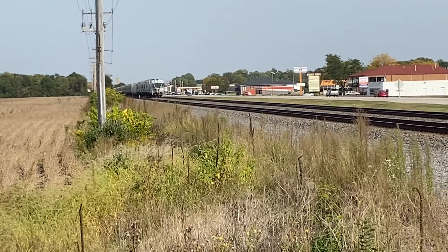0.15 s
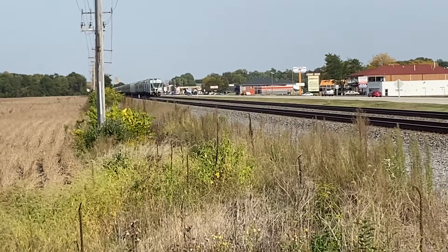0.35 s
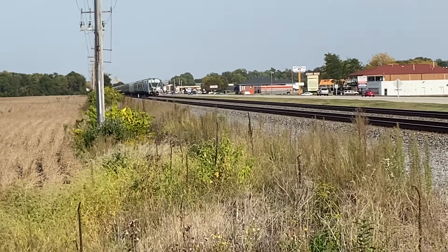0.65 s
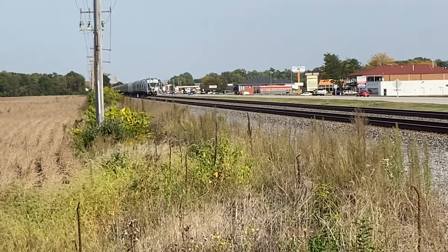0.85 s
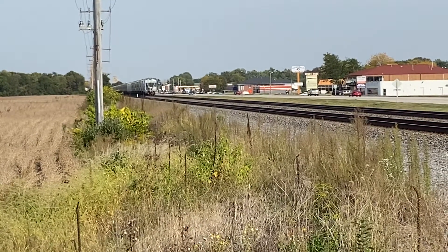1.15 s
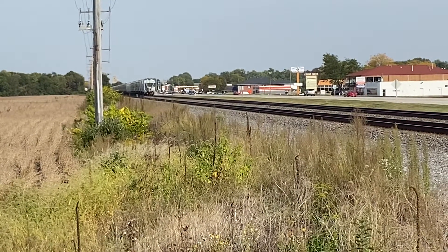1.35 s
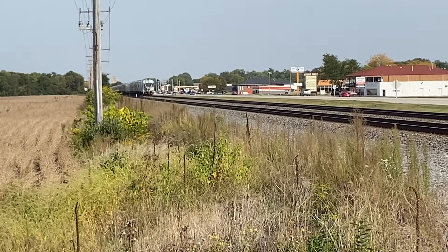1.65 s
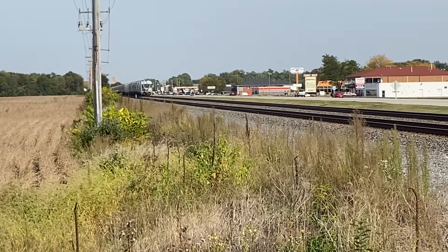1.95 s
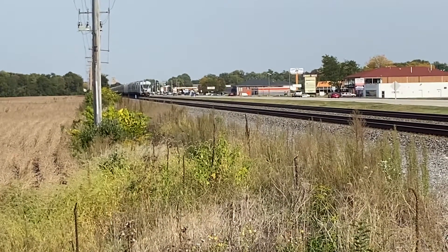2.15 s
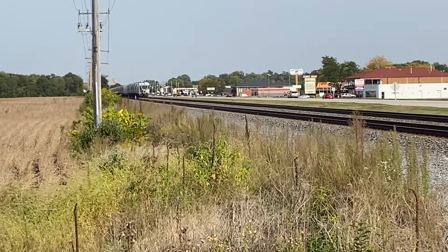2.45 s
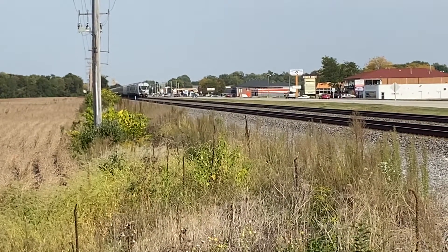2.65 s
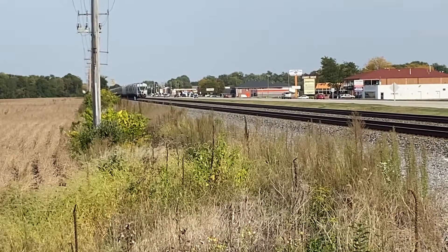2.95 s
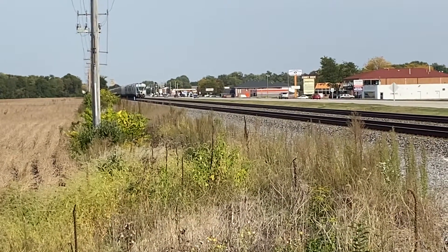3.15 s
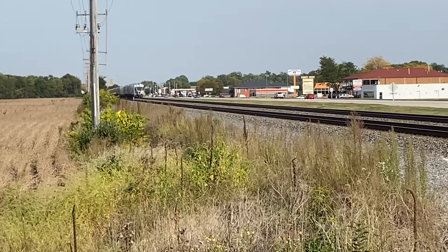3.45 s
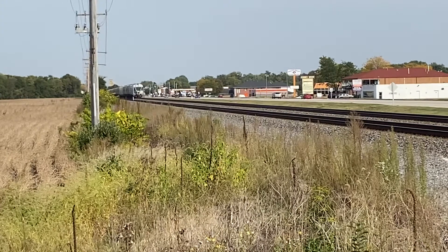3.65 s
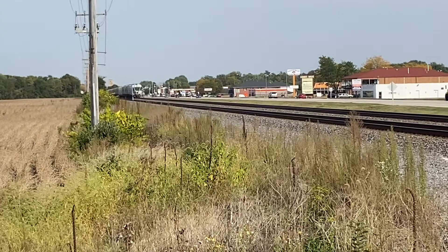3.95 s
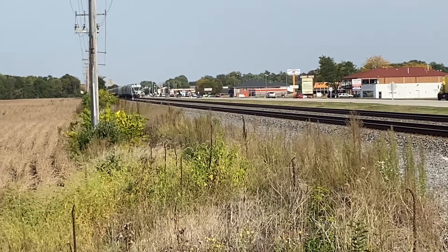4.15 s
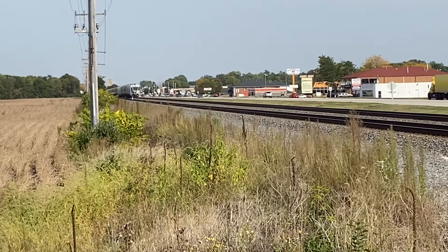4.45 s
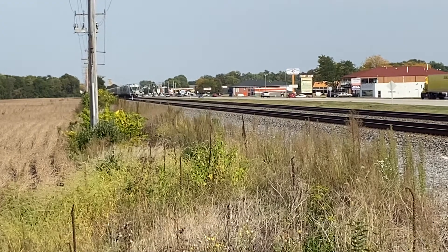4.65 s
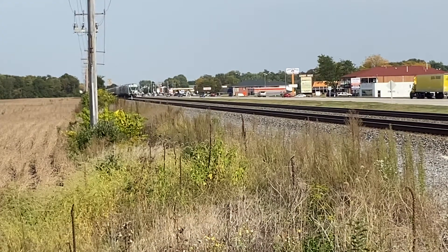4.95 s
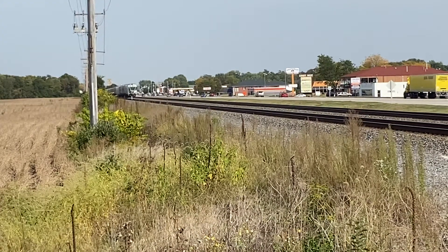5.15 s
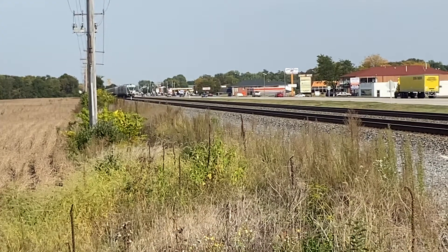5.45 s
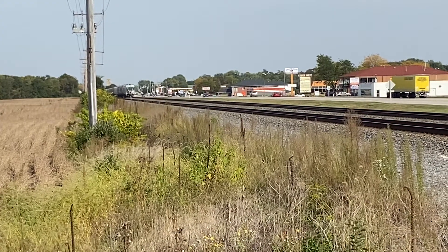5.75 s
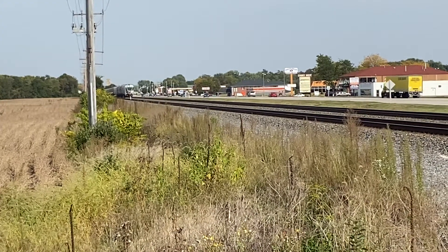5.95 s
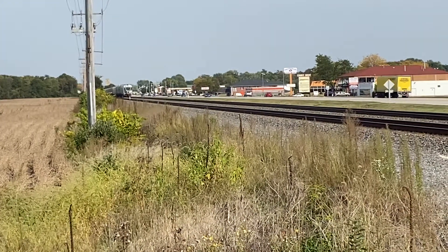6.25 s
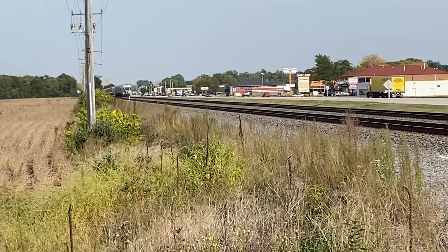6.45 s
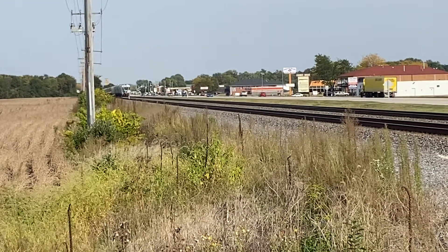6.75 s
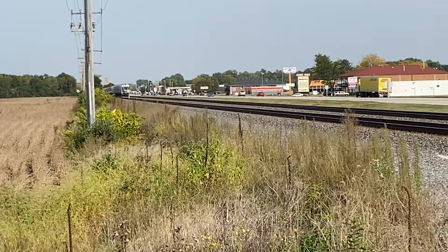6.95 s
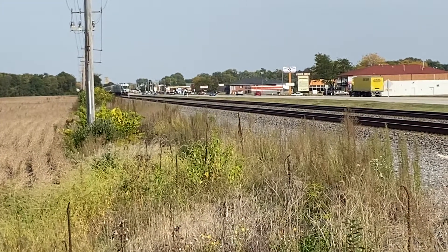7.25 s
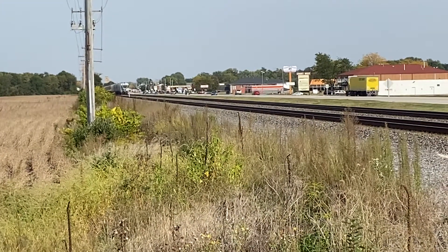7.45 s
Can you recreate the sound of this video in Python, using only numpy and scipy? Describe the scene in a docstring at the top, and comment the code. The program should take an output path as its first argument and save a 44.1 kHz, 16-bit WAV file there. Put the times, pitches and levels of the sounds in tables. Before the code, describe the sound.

Open roadside by a field and rail tracks, recorded in stereo with steady low traffic rumble, mid tyre roar and soft hiss. From 0 s a car's eight-cylinder engine is heard, moderate and low, with a dull double knock at 0.4 s and a faint squeak near 0.9 s. The engine climbs smoothly and swells, loudest around 2.5 to 3.3 s as it passes and its image shifts across. It then recedes, pitch still rising, weaker and raspier by 5.5 s, with wavering tones. A bright cluster of metal clinks and rustle comes close at 4.9 to 5.1 s, followed by a thin squeak to 5.4 s. Lighter ticks follow at 5.6 and 6.2 s, a small rattly knock at 6.3 s, more squeaking to 6.8 s. A far diesel drone swells gently around 6 s. The engine peaks in pitch at 6.85 s, then falls quickly through a gear change until 7.6 s.

```python
"""Beside a field, a car with an eight-cylinder engine accelerates past, swells, recedes and changes gear.
The engine is a stack of tones at multiples of its cycle rate; its tyres are shaped noise.
Small metal parts clink, squeak and rustle near the microphones, made of ringing tones and short noise bursts.
Behind lie traffic, made of bands of noise, and a far diesel, made of three low wavering tones."""
import sys
import numpy as np
from scipy import signal
from scipy.fft import rfft, irfft, next_fast_len
from scipy.io import wavfile
from scipy.ndimage import uniform_filter1d, map_coordinates

SR = 44100
rng = np.random.default_rng(int(sys.argv[2]) if len(sys.argv) > 2 else 0)


def waveform_to_disk(signal):
    """Save audio, clipped to [-1, 1], as 16-bit WAV at the path in sys.argv[1]."""
    frames = np.transpose(np.atleast_2d(signal))
    scaled = np.clip(frames, -1, 1) * 32767
    samples = np.round(scaled).astype(np.int16)
    wavfile.write(sys.argv[1], SR, samples)


N = 335378  # length in samples


def amp(db):
    """Gain of a level in dB."""
    return 10 ** (np.asarray(db) / 20)


def unit(x):
    """x scaled to an average (rms) level of 1."""
    return x / np.sqrt(np.mean(x ** 2) + 1e-20)


def along(points, hz):
    """Read a curve of (Hz, value) points on a log pitch axis."""
    point_hz, value = np.transpose(points)
    return np.interp(np.log(hz + 1), np.log(point_hz + 1), value)


def curves(rows):
    """One value per sample for each column after the time."""
    time_s, *columns = np.transpose(rows)
    return [np.interp(np.arange(N) / SR, time_s, column) for column in columns]


def wobble(rate):
    """A smooth random curve with rate random points a second."""
    points = rng.standard_normal(int(N * rate / SR) + 4)
    return map_coordinates(points, [np.arange(N) * rate / SR])


def filtered(x, response):
    """Shape x by a gain for each frequency, which may be complex."""
    size = next_fast_len(N + SR // 2)
    hz = np.fft.rfftfreq(size, 1 / SR)
    return irfft(rfft(x, size) * response(hz), size)[..., :N]


def rush(spectrum, patchy_db):
    """A pair of coloured noises of rms 1 whose gain varies in random patches of time and pitch."""
    grid = signal.stft(rng.standard_normal((2, N)), nperseg=512)[2]
    patches = uniform_filter1d(rng.standard_normal(grid.shape[1:]), size=6, axis=0)  # across pitch
    patches = uniform_filter1d(patches, size=14, axis=1)  # across time
    pair = signal.istft(grid * amp(patchy_db * unit(patches)), nperseg=512)[1][:, :N]
    return unit(filtered(pair, lambda hz: amp(along(spectrum, hz))))


PASS_S, PASS_SPAN_S = 2.774, 0.25  # when the car crosses in front of the microphones, and how long it takes


def passed(late_s=0):
    """How far the car has crossed, from 0 to 1."""
    return .5 + .5 * np.tanh((np.arange(N) / SR - PASS_S - late_s) / PASS_SPAN_S)


# speed of the engine: time_s, cycle_rate_hz
ENGINE_SPEED = [(0.0, 11.8), (0.2, 11.77), (0.8, 12.88), (0.95, 13.55), (1.15, 14.75), (1.5, 15.1),
                (1.65, 15.6), (2.1, 17.85), (2.55, 19.1), (3.0, 19.88), (3.2, 20.13), (3.4, 20.43),
                (3.6, 20.81), (4.0, 21.5), (4.35, 22.15), (5.4, 24.55), (6.6, 27.68), (6.85, 28.7),
                (7.04, 27.85), (7.28, 23.95), (7.45, 21.85), (7.6, 20.7)]
# the two banks fire unevenly, which fills in the multiples of the cycle rate;
# each family name holds rows of: multiple (a count), level_db against its family
FAMILIES = {"octave": [(16, -25.5)], "low lope": [(5, -1)], "high lope": [(11, -6), (12, -15)],
            "throb": [(9, 0)], "high throb": [(10, 1)], "drone": [(2, -21.5), (3, 0), (4, 2.5)],
            "low throb": [(6, -0.5), (7, -4.5)], "whine": [(13, 1.5)], "high whine": [(14, 0)],
            "rasp": [(15, -46.5), (17, -42.5), (18, -46), (19, -40), (20, -44), (21, -45), (22, -40.5),
            (23, -46.5), (24, -49.5), (25, -43.5), (26, -42.5), (27, -45), (28, -48)]}
# exhaust levels before resonances and fading: time_s, firing_tone_db, low_lope_db, drone_db, throb_db,
# high_throb_db, high_lope_db
EXHAUST = [(0.0, -30, -42, -54, -55, -53, -40), (0.7, -21, -44, -46, -53, -61, -44),
           (1.0, -22, -44, -46, -45, -44, -45), (1.3, -21.5, -36, -42, -46, -40, -38),
           (1.6, -22, -32, -48, -40, -42, -38), (1.9, -19.5, -29, -42, -37.5, -35.5, -28),
           (2.2, -20.5, -24.5, -33, -32.5, -28.5, -34), (2.4, -15, -20.5, -34, -39, -34.5, -28.5),
           (2.7, -12.5, -20.5, -34, -38, -45, -22.5), (3.0, -11.5, -19.5, -40.5, -34, -43, -26.5),
           (3.3, -13, -21, -33, -36, -42.5, -27), (3.7, -14.5, -22.5, -35.5, -37, -44, -27.5),
           (4.15, -15, -23.5, -35.5, -50, -46, -29.5), (4.5, -18.5, -33, -33.5, -54, -36.5, -32),
           (4.9, -22.5, -31, -32.5, -66, -33, -34.5), (5.5, -33, -35, -36.5, -50, -40, -34.5),
           (5.85, -29.5, -46, -34.5, -32, -56, -49), (6.2, -28.5, -39, -40, -35.5, -54, -42),
           (6.5, -25.5, -47, -35.5, -37, -41, -41), (6.8, -23.5, -41, -33, -36.5, -40.5, -28.5),
           (7.05, -21.5, -39, -35.5, -34, -46, -28), (7.2, -30.5, -36, -39.5, -34.5, -47, -42.5),
           (7.4, -28.5, -34.5, -41, -49, -43, -38), (7.6, -28, -43, -43, -56, -50, -32)]
# more uneven tones, likewise: time_s, low_throb_db, whine_db, high_whine_db
UNEVEN = [(0, -45, -46, -49), (0.9, -51, -37, -44), (1.2, -39, -39, -52), (1.5, -38, -36, -50),
          (1.8, -39, -34, -43), (2.1, -29, -28.5, -35), (2.4, -35, -24, -47), (2.7, -36, -25, -56),
          (3.0, -36, -27.5, -52), (3.3, -28.5, -40, -43), (3.6, -34.5, -32, -40.5), (3.9, -38, -30.5, -39),
          (4.2, -32.5, -32, -41.5), (4.5, -37, -38, -32.5), (4.8, -39, -37.5, -38), (5.1, -47, -43, -46),
          (5.7, -35.5, -46, -50), (6.3, -43, -50, -61), (6.8, -35, -61, -48), (7.05, -34, -55, -47),
          (7.25, -45, -49, -52), (7.6, -43, -50, -49)]
# the exhaust pipe's resonance lifts tones that cross it: pitch_hz, half_width_hz, lift_db
PIPE = [(159, 22.3, 11)]
# resonances that lift the octave; the first lifts the high lope half as much: pitch_hz, half_width_hz, lift_db
TAILPIPE = [(241.2, 22, 18), (327.8, 9.5, 11)]
# resonances that lift the rasp above multiple 16: pitch_hz, half_width_hz, lift_db
GROWL = [(463, 14, 8), (383.5, 7.5, 6), (526, 20, 1.5)]
BEHIND_DB = 8.5  # the rasp gains once the tailpipe points back at the microphones
RASP_FOLLOWS = 0.71  # the rasp's share of the firing tone's swing in dB
MUFFLE_HZ, MUFFLE_DB = 303, 41  # the silencer dulls the high lope above this pitch; loss an octave
# tones slip behind as they climb through the pipe's upper edge
TURN_HZ, TURN_WIDTH_HZ, TURN_RAD = 182, 10, 2.8
LOPE_LEAD_RAD, LOPE_LEAD_HZ = 2.2, 82  # the low lope runs further ahead below this pitch


def engine():
    """Tones at multiples of the engine cycle; eight firings a cycle make the eighth the firing tone."""
    rate = curves(ENGINE_SPEED)[0]
    angle = 2 * np.pi * np.cumsum(rate) / SR

    def lag(k):
        """Phase shift in radians: tones nearly in step, with slips and slow drift."""
        shift = .06 * (k - 9) * wobble(.7)
        if k == 5:
            low_pitch = .5 - .5 * np.tanh((k * rate - LOPE_LEAD_HZ) / 5)
            shift += .7 + LOPE_LEAD_RAD * low_pitch
        if k < 8:
            shift -= .8
        if k == 7:
            shift -= 2.7 * passed(late_s=-.3)  # falls out of step around the pass
        shift -= .35 * max(k - 16, 0) ** 2  # the rasp lags
        turn = TURN_RAD * (.5 + .5 * np.tanh((k * rate - TURN_HZ) / TURN_WIDTH_HZ))
        return shift - np.clip((13 - k) / 3, 0, 1) * turn

    def tone(k, db):
        """One multiple of the cycle with an unsteady phase."""
        jitter = .0007 * k * k * wobble(25) + (k > 16) * .2 * wobble(60)
        return -np.sqrt(2) * amp(db) * np.cos(k * angle + lag(k) + jitter)

    def lift(k, peaks):
        """Boost in dB as a tone moves through the resonances."""
        return sum(db / (1 + ((k * rate - hz) / width_hz) ** 2) for hz, width_hz, db in peaks)

    def resonance_db(k):
        """Total boost of the resonances this multiple meets."""
        boost = 0
        if 8 < k < 13:
            boost = boost + lift(k, PIPE)
        if 10 < k < 13:
            boost = boost + lift(k, TAILPIPE[:1]) / 2
        if k == 16:
            boost = boost + lift(k, TAILPIPE)
        if k > 16:
            boost = boost + lift(k, GROWL)
        return boost

    firing_db, lope_db, drone_db, throb_db, high_throb_db, high_lope_db = curves(EXHAUST)
    rasp_db = RASP_FOLLOWS * firing_db + BEHIND_DB * passed(late_s=0.28)
    levels = {"octave": firing_db, "low lope": lope_db, "high lope": high_lope_db, "throb": throb_db,
              "high throb": high_throb_db, "drone": drone_db, "rasp": rasp_db}
    levels.update(zip(("low throb", "whine", "high whine"), curves(UNEVEN)))

    out = tone(8, firing_db + 0.52 * wobble(18))
    for name, family in FAMILIES.items():
        for k, db in family:
            # echoes of ground and walls fade each tone on its own, high ones most
            fading_db = -(0.008 if k > 16 else 0.005) * k * k * np.abs(wobble(3.5))
            muffle_db = (name == "high lope") * MUFFLE_DB * np.log2(np.maximum(k * rate / MUFFLE_HZ, 1))
            out += tone(k, db + levels[name] + resonance_db(k) - muffle_db + fading_db)
    return out


# road noise before each layer's own offset: time_s, rumble_db, tyre_roar_db, hiss_db
NOISE = [(0.0, -32, -35.5, -49), (0.75, -30, -36.5, -49), (1.25, -31.5, -35.5, -46.5),
         (1.9, -27.5, -35.5, -46), (2.45, -29, -34, -46.5), (2.8, -26.5, -33, -44), (3.6, -27.5, -35, -47),
         (4.25, -29, -36.5, -49), (4.85, -26.5, -34.5, -48.5), (5.1, -29, -35.5, -45),
         (5.5, -31.5, -36, -46.5), (5.8, -29.5, -38, -53), (6.4, -30.5, -36.5, -49.5),
         (7.0, -32.5, -37.5, -51), (7.6, -29, -38, -51.5)]
# colour of the tyre roar: pitch_hz, level_db (per Hz)
ROAR = [(200, -32.5), (350, -3), (500, -1.5), (800, -4), (1300, -7.5), (2000, -14), (3000, -35.5),
        (4500, -61)]


def tyres():
    """The car's own share of the tyre roar, as noise with a wavering level."""
    level_db = curves(NOISE)[1] - 7.5 + 0.38 * wobble(7.6)
    return amp(level_db) * rush(ROAR, patchy_db=1.0)[0]


LEAD_MS, LEAN_DB = (-0.84, 0.49), (1, 2.5)  # left leads, left louder: before and after the pass


def bearing(x):
    """The car's direction swings across, which shifts the delay and level between the two microphones."""
    gone = passed()
    lead_ms, lean_db = (before + (after - before) * gone for before, after in (LEAD_MS, LEAN_DB))
    sides = np.array([[.5], [-.5]])  # left, right
    read_at = np.arange(N) + sides * lead_ms * SR / 1000
    return map_coordinates(x, [read_at], mode="nearest") * amp(sides * lean_db)


# metal clinks: start_s, ring_db, scrape_db, low_modes_db (the lower modes against the upper)
CLINKS = [(3.870, -54.5, -40.5, -7), (4.865, -38.5, -36.5, 2), (4.89, -34, -40.5, -7),
          (4.938, -41, -45, -6), (4.967, -44.5, -42, -3), (5.038, -40.5, -46, -6), (5.104, -46, -45, -8),
          (5.637, -50, -44.5, -18), (5.704, -57, -46.5, -12), (6.194, -47, -50, -8),
          (6.27, -51, -49.5, -10), (6.743, -54, -42, -10), (6.88, -55.5, -44.5, -13), (7.185, -71, -45, -4)]
# ringing modes of the metal: pitch_hz, level_db (within the ring), fade_s (time to fall 60 dB)
METAL = [(4295, -4, .07), (5250, -5, .05), (6120, -5, .07), (6850, -10, .06), (9300, -11, .07),
         (10160, -14, .12), (12040, -14, .12), (14020, -16, .1), (15110, -13, .12)]


def clinks():
    """Each contact rings the metal at new strengths over a short noisy scrape."""
    rings, scrapes = np.zeros(N + SR), np.zeros(N + SR)
    t = np.arange(SR // 4) / SR
    for start_s, ring_db, scrape_db, low_db in CLINKS:
        ring = 0
        for hz, level_db, fade_s in METAL:
            mode_db = level_db + low_db * (hz < 8000) + rng.normal(0, 3)
            ring = ring + amp(mode_db - 60 * t / fade_s) * np.sin(2 * np.pi * hz * t)
        span = slice(round(start_s * SR), round(start_s * SR) + len(t))
        rings[span] += amp(ring_db) * ring * (1 - np.exp(-t / 0.0037))
        scrape = amp(scrape_db - 60 * t / 0.075) * (1 - np.exp(-t / 0.003))
        scrapes[span] += scrape * rng.standard_normal(len(t))
    rattle = amp(3.5 * wobble(120))  # loose parts make the ring uneven
    thinned = filtered(scrapes[:N], lambda hz: (hz / 2800) ** 2 / (1 + (hz / 2800) ** 2.5))
    return rattle * rings[:N] + thinned


# ringing tones of knocks, dull or bright; rows that start together belong to one knock:
# start_s, pitch_hz, fade_s (time to fall 60 dB), level_db
KNOCKS = [(.3805, 600, 0.021, -18), (0.4007, 560, 0.019, -8.5), (.4025, 1050, .02, -21),
          (4.8675, 2850, 0.032, -20.5), (4.868, 7600, .03, -34), (4.870, 6120, .07, -33),
          (4.878, 3310, .04, -33), (4.870, 4450, 0.033, -27.5), (4.871, 5060, 0.027, -27),
          (4.872, 3400, .02, -31), (4.894, 3990, 0.067, -33), (4.896, 6150, .04, -33),
          (4.966, 4160, .04, -37), (5.639, 7600, .06, -48), (6.300, 2290, .025, -27.5),
          (6.303, 2060, .03, -32), (6.320, 3250, .09, -34), (6.329, 1700, .02, -31),
          (6.331, 3200, .06, -34), (6.332, 3750, .03, -36), (6.345, 4200, .03, -38),
          (6.358, 3650, .08, -40), (6.39, 3650, .08, -41)]


def knocks():
    """Knocks built from ringing tones that die away quickly."""
    out, t = np.zeros(N + SR), np.arange(SR // 10) / SR
    for start_s, hz, fade_s, db in KNOCKS:
        envelope = amp(db - 60 * t / fade_s) * (1 - np.exp(-t / 0.0015))
        out[round(start_s * SR):][:len(t)] += envelope * np.sin(2 * np.pi * hz * t)
    return out[:N]


# thin squeaks: start_s, end_s, start_pitch_hz, end_pitch_hz, level_db, octave_db
SQUEAKS = [(0.853, 0.938, 3320, 3350, -47, -65), (1.44, 1.645, 3300, 3335, -72, -60),
           (4.951, 5.36, 1960, 2038, -47, -78), (5.849, 6.5, 2040, 2064, -54, -81),
           (6.6, 6.778, 3130, 3210, -53.5, -80)]


def squeaks():
    """Thin gliding tones, each with an octave, unsteady in pitch and level."""
    out = np.zeros(N)
    for start_s, end_s, from_hz, to_hz, db, octave_db in SQUEAKS:
        span = slice(round(start_s * SR), round(end_s * SR))
        n = span.stop - span.start
        angle = 2 * np.pi * np.cumsum(np.linspace(from_hz, to_hz, n)) / SR + 1.1 * wobble(130)[span]
        swell = np.hanning(n) ** .3 * amp(1.5 * wobble(30)[span] + 2.5 * wobble(150)[span])
        tones = amp(db) * np.sin(angle) + amp(octave_db) * np.sin(2 * angle)
        out[span] += np.sqrt(2) * swell * tones
    return out


# short rustles: start_s, length_s (peaks at a third, tail runs to four lengths), pitch_hz, width_hz, level_db
PUFFS = [(0.376, 0.006, 6200, 2500, -52.5), (2.932, 0.22, 856, 130, -33.5),
         (4.864, 0.035, 5000, 4500, -37.5), (4.885, 0.033, 4700, 4850, -39), (4.896, 0.18, 4730, 4210, -45),
         (4.932, 0.01, 9000, 9050, -52), (4.956, 0.05, 4160, 500, -50), (4.962, 0.036, 6200, 2500, -47),
         (6.3, 0.1, 3200, 2000, -47), (6.319, 0.035, 4300, 600, -54), (6.31, 0.08, 9000, 7000, -61.5),
         (6.322, 0.05, 2050, 400, -46), (6.356, 0.061, 3650, 400, -56)]


def puffs():
    """Bursts of noise around one pitch, quick to rise and slower to fall."""
    out = np.zeros(N + SR)
    for start_s, length_s, hz, width_hz, db in PUFFS:
        u = np.arange(round(4 * length_s * SR)) / (length_s * SR)  # time in lengths
        edges_hz = [max(hz - width_hz / 2, 50), hz + width_hz / 2]
        band = signal.butter(2, edges_hz, "band", fs=SR, output="sos")
        noise = unit(signal.sosfilt(band, rng.standard_normal(len(u) + 2000))[2000:])
        out[round(start_s * SR):][:len(u)] += amp(db) * noise * 3 * u * np.exp(1 - 3 * u)
    return out[:N] * amp(2.2 * wobble(500))  # the rustle crackles


# colours of the other traffic noises, each: pitch_hz, level_db (per Hz)
RUMBLE = [(15, -43), (25, -24.5), (45, -10), (80, -2), (130, -5.5), (220, -7), (330, -10), (450, -31),
          (700, -60)]
HISS = [(1200, -31.5), (2200, 0), (3200, -4), (4500, -11.5), (6000, -19.5), (7800, -21), (8800, -21),
        (10000, -77)]
SIZZLE = [(2800, -32), (4000, -0.5), (5200, -0.5), (6500, -6.5), (8200, -8), (9000, -40)]  # the bright part of the tyre hiss
FIZZ = [(8000, -40), (9200, -12.5), (10100, 0), (12000, -3), (13200, -26.5), (14500, -4.5), (15700, -10)]  # the top of the hiss
# level of the sizzle before gusts: time_s, level_db
SIZZLE_LEVEL = [(0, -72), (0.9, -66), (1.3, -55), (2.0, -55.5), (3.2, -57.5), (4.2, -65), (5.0, -56.5),
                (5.7, -58.5), (6.2, -66), (7.6, -61)]
FIZZ_DB, FIZZ_GROWS = -74, 2.62  # fizz level at a table hiss of -50 dB; it swings wider than the hiss
ROAR_MIX = 0.3  # share of the middle roar mixed into the side roar, and the reverse


def traffic():
    """Rumble, tyre roar and hiss as noise; gusts of air move all but the rumble together."""
    rumble_db, roar_db, hiss_db = curves(NOISE)
    fizz_db = FIZZ_DB + FIZZ_GROWS * (hiss_db + 50)
    gust = wobble(3.2)
    roar = rush(ROAR, patchy_db=0.6)  # middle and side
    roar = unit(roar + ROAR_MIX * roar[::-1])
    return (amp(rumble_db + 0.56 * wobble(6.1)) * rush(RUMBLE, patchy_db=0.5)
            + amp(roar_db + 1.0 + 0.27 * gust) * roar
            + amp(hiss_db + 1.42 + .5 * gust) * rush(HISS, patchy_db=1.2)
            + amp(curves(SIZZLE_LEVEL)[0] + .5 * gust) * rush(SIZZLE, patchy_db=1.25)
            + amp(fizz_db + .5 * gust) * rush(FIZZ, patchy_db=2.5)[0])


# tones of the far diesel: pitch_hz, level_db (before the swell)
DIESEL = [(47.5, -42), (94.5, -37), (141, -38.5)]
# its slow swell: time_s, gain_db
DIESEL_SWELL = [(0, -5.5), (3.5, -7.5), (5.2, 3.5), (6.2, 7), (7.0, 0.5), (7.6, -8)]


def diesel():
    """A far engine whose steady low tones waver a little, off to one side."""
    t = np.arange(N) / SR + np.array([[.00025], [-.00025]])
    drone = 0
    for hz, db in DIESEL:
        level = np.sqrt(2) * amp(db + 1.1 * wobble(7))
        drone = drone + level * np.sin(2 * np.pi * hz * t + 1.1 * wobble(2.016))
    return drone * amp(curves(DIESEL_SWELL)[0]) * amp([[.8], [-.8]])


# how alike left and right are: pitch_hz, likeness (no unit; 1 is the same, values are held within -1 to 1)
ALIKE = [(30, 0.94), (60, 0.85), (100, 0.95), (160, 0.72), (270, .65), (450, 0.24), (740, -0.2),
         (1220, -0.23), (1800, 0.36), (2300, 0.99), (3300, 1), (7300, 1), (8300, -0.57), (9400, -1.02),
         (10300, 0.68), (12500, 0.36), (15000, -0.1)]
# balance of the two sides: pitch_hz, left_louder_db
LEAN = [(60, -0.5), (120, 2.5), (240, -2), (480, -0.5), (950, -4.5), (1890, -2), (3770, 0), (7520, 0),
        (15000, 0)]


def spread(pair):
    """Mix a middle and an opposed side signal to set how alike left and right are at each pitch."""
    def middle_and_side(hz):
        turn = np.arccos(np.clip(along(ALIKE, hz), -1, 1)) / 2
        return np.array([np.cos(turn), 1j * np.sin(turn)])

    mid, side = filtered(pair, middle_and_side)
    left_right = np.array([mid + side, mid - side])
    return filtered(left_right, lambda hz: amp(along(LEAN, hz) * [[.5], [-.5]]))


def scene():
    """The car arrives from its bearing; the rest fills the field."""
    car = bearing(engine() + tyres())
    field = spread(traffic() + clinks() + puffs() + knocks() + squeaks())
    return car + diesel() + field


TOP_HZ = 15750  # band limit


def record(dry):
    """Nothing above the band limit gets through."""
    return filtered(dry, lambda hz: hz < TOP_HZ)


dry = scene()
out = record(dry)
waveform_to_disk(out)
```